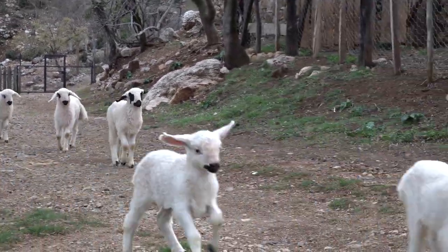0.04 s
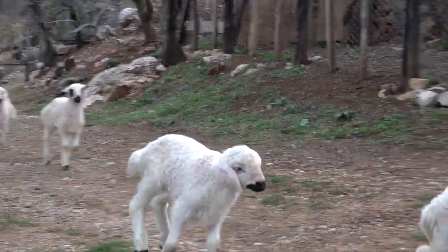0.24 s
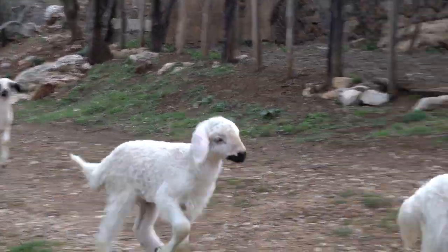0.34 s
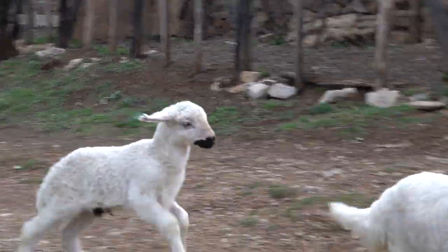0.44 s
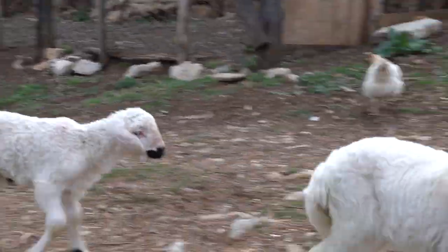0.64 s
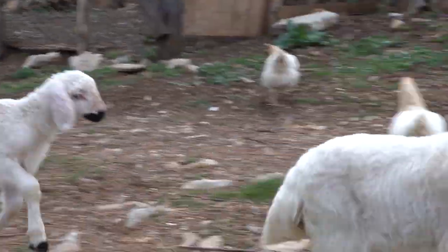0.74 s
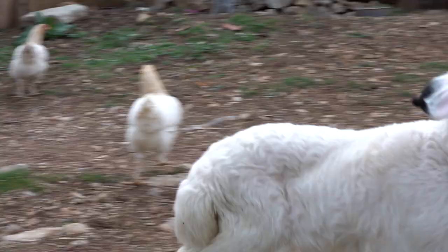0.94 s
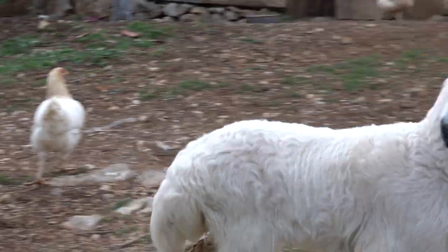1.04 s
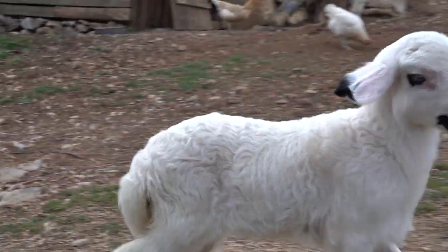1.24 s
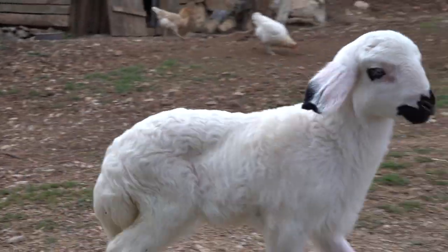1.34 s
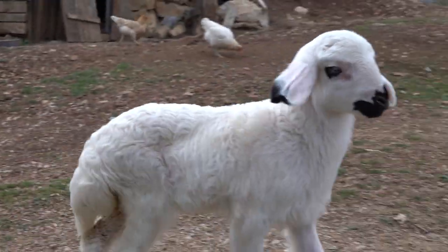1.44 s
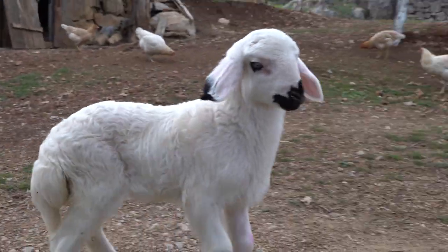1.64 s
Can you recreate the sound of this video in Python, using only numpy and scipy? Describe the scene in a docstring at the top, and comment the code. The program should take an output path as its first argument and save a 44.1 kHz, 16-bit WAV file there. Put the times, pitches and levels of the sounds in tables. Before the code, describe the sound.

A lamb close by, slightly left, gives one long quavering bleat after dull scuffs and thuds on gritty earth; three crunching steps and small stone clicks accompany it in a quiet open yard, heard in stereo.

```python
"""A lamb close by gives one long, quavering bleat, its sound leaning a little to the left: rasped pulses ring
five resonances. A walker on gritty earth gives dull scuffs (filtered grains), then three crunching steps (grain
bursts), with low thuds (decaying sines). Short ticks (damped modes and a crack) are mostly small stones. Under
it all lie a low hum (wavering sine), faint outdoor air (filtered noise) and sparse gritty clicks."""
import sys
import numpy as np
from scipy import signal
from scipy.fft import rfft, irfft
from scipy.io import wavfile
from scipy.ndimage import uniform_filter1d

SR = 44100
rng = np.random.default_rng(int(sys.argv[2]) if len(sys.argv) > 2 else 0)


def store_pcm(level_fs):
    """Save levels as 16-bit WAV."""
    pcm = np.round(np.clip(level_fs, -1, 1) * 32767).astype(np.int16)
    wavfile.write(sys.argv[1], SR, np.atleast_2d(pcm).T)


N = 74970
T = np.arange(N) / SR
HZ = np.maximum(np.fft.rfftfreq(2 * N, 1 / SR), 1)


def from_db(db):
    """Decibels to gain."""
    return 10 ** (np.asarray(db) / 20)


def rms_one(x):
    """Scale to unit power."""
    return x / np.sqrt(np.mean(x ** 2) + 1e-20)


def in_time(rows):
    """Join (t/s, value) points by straight lines."""
    return np.interp(T, *np.transpose(rows))


def at_hz(points):
    """Join (f/Hz, value) points on a log-frequency axis."""
    hz, value = np.transpose(points)
    return np.interp(np.log(HZ), np.log(hz), value)


def colour(x, gain):
    """Filter by a smooth gain per frequency."""
    return irfft(rfft(x, 2 * N) * gain)[..., :N]


def low_cut(x, hz):
    """Thin out the bass with a second-order high-pass."""
    return signal.sosfilt(signal.butter(2, hz, "high", fs=SR, output="sos"), x + 1e-18)


def pan(left_right_db):
    """Left and right gains for a level difference."""
    return from_db(np.array([[.5], [-.5]]) * left_right_db)


def drift(rate_hz):
    """Smoothed noise of spread 1, falling off above rate_hz."""
    return rms_one(colour(rng.standard_normal(N), 1 / (1 + (HZ / rate_hz) ** 2)))


def swell(start_s, attack_s, t60_s):
    """A straight rise, then an exponential fall."""
    rise = np.clip((T - start_s) / attack_s, 0, 1)
    return rise * from_db(-60 * np.maximum(T - start_s - attack_s, 0) / t60_s)


def sine(hz, t):
    """A sine at time t, starting from zero phase."""
    return np.sin(2 * np.pi * hz * t)


def grains(per_s, spread_db):
    """Two trains of random clicks of uneven size and random sign."""
    sizes = from_db(spread_db * np.minimum(rng.exponential(1, (2, N)), 4))
    signs = rng.choice([-1, 1], (2, N))
    return sizes * signs * (rng.random((2, N)) < per_s / SR)


# Stereo likeness: f/Hz, left-right likeness [0-1]
LIKENESS = [(60, 1), (300, .988), (1000, 0.72), (3000, 0.78), (5000, 0.92), (8000, 0.15), (15000, 0.68)]


def spread(pair, spectrum_db):
    """Colour two unrelated signals and mix to the left-right likeness at each frequency; rms 1."""
    alike = np.clip(at_hz(LIKENESS), 0, 1)
    mid, side = colour(pair, from_db(spectrum_db) * np.sqrt([1 + alike, 1 - alike]))
    return rms_one(np.array([mid + side, mid - side]))


# Air spectrum: f/Hz, relative level/dB per Hz
AIR = [(20, 7), (45, 4), (70, 12.5), (130, -3), (300, -2.5), (600, -5), (950, -3.5), (1500, -6),
       (3000, -10), (5000, -14.5), (7500, -17), (11000, -21), (16000, -30)]
# Air: t/s, level/dB
AIR_LEVEL = [(0, -46.5), (.13, -52.5), (.45, -43), (1.2, -49), (1.45, -51), (1.7, -52)]
# Hum: t/s, level/dB
HUM_LEVEL = [(0, -53.5), (.7, -52), (1.1, -47.5), (1.7, -48)]
# Gritty clicks and the crack of a tick: f/Hz, relative level/dB per Hz
GRIT = [(500, 4), (2000, -3.5), (5000, 4), (7500, -11), (10000, -3), (16000, -48)]
HUM_HZ, HUM_WAVER_FRACTION, HUM_WAVER_HZ = 36.3, .05, 5.2
GRIT_DB, GRIT_PER_S = -66, 69


def background():
    """Outdoor air as shaped noise, a frequency-wavering hum and sparse random clicks like loose grit."""
    air = from_db(in_time(AIR_LEVEL)) * spread(rng.standard_normal((2, N)), at_hz(AIR))
    hum_hz = HUM_HZ * (1 + HUM_WAVER_FRACTION * drift(HUM_WAVER_HZ))
    hum = np.sqrt(2) * np.sin(2 * np.pi * np.cumsum(hum_hz) / SR)
    grit = spread(grains(GRIT_PER_S, spread_db=0), at_hz(GRIT))
    return air + from_db(in_time(HUM_LEVEL)) * hum + from_db(GRIT_DB) * grit


# Dull rustles, soft low air at the start, then scuffs of a sole: t/s, level/dB, attack/s, t60/s
RUSTLES = [(0, -50, 0.0059, 1), (0.183, -40, .002, 0.31), (.2, -31, .012, 0.39), (.25, -38.5, 0.025, 0.93),
           (.385, -41, 0.0091, 0.064), (.452, -56, 0.0065, .1), (1.1, -44.5, 0.013, 0.12),
           (1.238, -47, 0.0073, 0.13)]
# Rustle spectrum: f/Hz, relative level/dB per Hz
RUSTLE = [(50, -7), (130, -8), (200, -1), (310, 3.5), (430, -8), (900, -10.5), (1300, -17.5), (2400, -18.5),
          (4200, -25.5), (5600, -22.5), (6800, -38), (15000, -47)]
GRAINS_PER_S, GRAIN_SPREAD_DB = 9000, 1.5  # also for the footfalls


def rustles():
    """Soft low air, then a sole dragging dully over packed earth: dense grains under decaying envelopes."""
    rub = spread(grains(GRAINS_PER_S, GRAIN_SPREAD_DB), at_hz(RUSTLE))
    envelope = sum(from_db(db) * swell(s, attack_s, t60_s) for s, db, attack_s, t60_s in RUSTLES)
    return pan(1.0) * rub * envelope


# Weight thuds: t/s, level/dB, t60/s
THUDS = [(.002, -49, 0.67), (.176, -29, 0.15), (0.198, -25.5, 0.15), (0.296, -30.5, 0.29),
         (0.783, -35, 0.13), (1.285, -46, 0.24)]
THUD_HZ, THUD_ATTACK_S = 62.2, 0.0056


def thuds():
    """Low, damped sine bumps of the walker's weight."""
    out = 0
    for s, db, t60_s in THUDS:
        out = out + from_db(db) * swell(s, THUD_ATTACK_S, t60_s) * sine(THUD_HZ, T - s)
    return out


# Short ticks: stones, and at 0.91 s probably a sharp pulse of the bleat
# t/s, level/dB (before the halving of each tick), main ring f/Hz, left-right/dB
TICKS = [(0.0266, -30, 5500, 0), (0.1871, -31, 2590, 4), (0.2143, -23.5, 4820, 8), (0.273, -28.5, 2380, 9),
         (.4895, -27.5, 6950, -3), (0.823, -26, 6440, -1), (0.9129, -30, 6660, 20), (1.2333, -26, 6530, 0),
         (1.2977, -23, 2680, 2), (1.433, -12, 4234, -2), (1.476, -33.5, 5470, 4), (1.5208, -31, 5330, 7.5),
         (1.5705, -30, 4300, -6.5), (1.649, -41, 4780, 12)]
# Tick modes: ratio to main ring, level/dB, t60/s
TICK_MODES = [(.47, -18, 0.023), (.58, -10, 0.015), (.78, -5, 0.0067), (1, 0, .005), (1.3, -7, 0.0079),
              (2.1, -25, 0.0069)]
CRACK_DB, CRACK_T60_S, TICK_LOW_HZ = -7.5, 0.014, 1470


def ticks():
    """Each tick is a tiny noise crack and a few short modes, as of a small stone, with the bass cut."""
    out = 0
    for s, db, hz, pan_db in TICKS:
        age_s = np.clip(T - s, 0, .2)
        modes = 0
        for k, (ratio, mode_db, t60_s) in enumerate(TICK_MODES):
            decay = from_db(mode_db - 60 * age_s / t60_s)
            modes = modes + (-1) ** k * decay * sine(hz * ratio, age_s)
        crack = spread(rng.standard_normal((2, N)), at_hz(GRIT)) * from_db(CRACK_DB - 60 * age_s / CRACK_T60_S)
        out = out + from_db(db) * pan(pan_db) * (T > s) * (modes + crack) / 2
    return low_cut(out, TICK_LOW_HZ)


# Footfalls: t/s, level/dB, t60/s, tail level/dB, treble tilt/dB per octave, left-right/dB
STEPS = [(0.339, -22, .14, -7.5, 3, 2.5), (0.781, -24.5, 0.31, -8, 2.2, 2),
         (1.234, -29.5, 0.26, -12.5, 1.6, 0.3)]
# Crunch spectrum, before tilt: f/Hz, relative level/dB per Hz
CRUNCH = [(50, 9), (130, -11), (300, 5.5), (600, -5.5), (880, 1.5), (1080, -3.5), (1330, 2), (2000, 0),
          (3000, -9), (4200, -9), (5500, -13.5), (7300, -29), (9300, -25), (12000, -42.5), (16000, -55)]
STEP_ATTACK_S, STEP_TAIL_T60_S, TILT_PIVOT_HZ = 0.0066, .42, 2000
SETTLE_PER_S, SETTLE_SPREAD_DB = 910, 3.5


def footsteps():
    """Each footfall crushes a dense burst of grit; sparser grains settle under a longer decay."""
    out = 0
    for s, db, t60_s, tail_db, tilt_db, pan_db in STEPS:
        spectrum_db = at_hz(CRUNCH) + tilt_db * np.log2(HZ / TILT_PIVOT_HZ)
        crush = spread(grains(GRAINS_PER_S, GRAIN_SPREAD_DB), spectrum_db)
        crush = crush * swell(s, STEP_ATTACK_S, t60_s)
        settle = spread(grains(SETTLE_PER_S, SETTLE_SPREAD_DB), spectrum_db)
        settle = settle * swell(s, STEP_ATTACK_S, STEP_TAIL_T60_S)
        out = out + from_db(db) * pan(pan_db) * (crush + from_db(tail_db) * settle)
    return out


def resonate(x, hz, width_hz, boost_db, size=128):
    """Lift or sink a gliding resonance, retuned once per block."""
    r, rung, state = np.exp(-np.pi * width_hz / SR), np.zeros(N), np.zeros(2)
    for i in range(0, N, size):
        poles = [1, -2 * r * np.cos(2 * np.pi * hz[i] / SR), r * r]
        rung[i:i + size], state = signal.lfilter([1, 0, -1], poles, x[i:i + size], zi=state)
    return x + (from_db(boost_db) - 1) * (1 - r * r) / 2 * rung


SMEAR_HZ, SMEAR_WIDTH_HZ = 2800, 1400


def smear(x):
    """The mouth's all-pass resonance spreads each pulse over a fraction of a millisecond."""
    r = np.exp(-np.pi * SMEAR_WIDTH_HZ / SR)
    poles = [1, -2 * r * np.cos(2 * np.pi * SMEAR_HZ / SR), r * r]
    return signal.lfilter(poles[::-1], poles, x)


# Pitch with its quaver: t/s, f/Hz
PITCH = [(.45, 227.7), (.48, 233.8), (.505, 212.1), (.539, 245.8), (.555, 205.3), (.573, 207),
         (.605, 249.4), (.633, 219.4), (.657, 227.4), (.681, 251.5), (.699, 257.7), (.733, 251.2),
         (.775, 268.5), (.799, 241.7), (.835, 269.8), (.869, 232.2), (.899, 257), (.933, 229.3),
         (.976, 256.4), (1.001, 241.2), (1.025, 251.5), (1.071, 245.9), (1.111, 191.3)]
# Rasp: t/s, amount [0-1]
RASP = [(.48, 1), (.53, 0.65), (.61, 0.54), (.7, 0.47), (.78, .22), (.87, 0.62), (.97, 0.39), (1.06, 0.37),
        (1.1, 0.75)]
JITTER_PER_RASP, JITTER_HZ = .05, 260  # pitch fraction; noise corner
UNEVEN_DB, UNEVEN_HZ, RASP_LOW_HZ = 2, 200, 890  # treble spread per unit rasp; noise corner; rasp low cut


def vocal_folds(pitch_hz):
    """Jittered harmonic pulses, uneven in the treble, and steady breathy noise that swells with each cycle."""
    rasp = np.clip(in_time(RASP), 0, 1)
    jitter = drift(JITTER_HZ)
    jitter = jitter - uniform_filter1d(jitter, size=300)
    phase = 2 * np.pi * np.cumsum(pitch_hz * (1 + JITTER_PER_RASP * rasp * jitter)) / SR
    pulses = rms_one(sum(np.cos(k * phase) for k in range(1, 56)))
    breath = rms_one(rng.standard_normal(N) * (4 + np.cos(phase)) ** 2)
    uneven = pulses * np.tanh(from_db(UNEVEN_DB * rasp * drift(UNEVEN_HZ)) - 1)
    return pulses + colour(uneven + rasp * breath, 1 / (1 + (RASP_LOW_HZ / HZ) ** 4))


# Vocal-fold spectrum: f/Hz, relative level/dB
FOLDS = [(120, -34), (250, 8), (500, 3.5), (800, 4.5), (1300, -3.5), (2000, -0.5), (3000, 5.5), (4400, 1.5),
         (5900, 2.5), (7200, -11), (10000, -18.5), (15000, -32)]
# Nasal dips: f/Hz, width/Hz, boost/dB
NASAL_DIPS = [(1148, 254, -9), (2460, 360, -5.5)]
# Throat and mouth: t/s, then f/Hz and boost/dB for each of five resonances
THROAT = [(.48, 457, 17, 840, 4.6, 1610, 28, 2320, 16, 3320, 9.4),
          (.52, 455, 10.3, 850, 26, 1930, 34, 2880, 13.5, 3300, 10.2),
          (.58, 467, 10.3, 842, 22.4, 1905, 24.2, 2930, 12.8, 3570, 15.3),
          (.64, 455, 11.5, 906, 25.3, 1933, 26, 3100, 10.4, 3560, 14),
          (.72, 470, 12.2, 854, 23, 1952, 27.8, 3060, 10.6, 3600, 15.6),
          (.83, 477, 11.2, 920, 30, 2026, 24, 3140, 14.8, 3600, 15),
          (.87, 486, 13.5, 960, 27.6, 2000, 22.5, 3090, 11.3, 3650, 17.6),
          (.935, 460, 11.7, 924, 25.4, 2003, 22.7, 3530, 11, 3690, 13),
          (.98, 480, 9.6, 935, 34.4, 1943, 22, 3350, 9.4, 3750, 17.8),
          (1.061, 470, 10.6, 941, 27.7, 1973, 17.2, 3720, 2.7, 3676, 19.8),
          (1.109, 477, 6.6, 843, 32, 1910, 19, 3800, 4.4, 4140, 19.6)]
# Width/Hz of each throat resonance
THROAT_WIDTH_HZ = [79, 102, 116, 213, 261]
# Boost per pitch rise/dB per Hz, for each throat resonance
QUAVER_DB_PER_HZ = [0.26, 0.09, 0.14, 0, 0]
# Effort: t/s, level/dB (before shimmer and pan)
EFFORT = [(.44, -71), (.465, -40.5), (.504, -40.5), (.516, -31), (.538, -25.5), (.568, -29), (.594, -25),
          (.70, -25.5), (.77, -26.5), (.84, -26), (.95, -27), (1.04, -29.5), (1.102, -30.5), (1.118, -43),
          (1.14, -55)]
# Lamb balance: f/Hz, left-right/dB
LAMB_PAN = [(200, 3), (400, 0.5), (800, 2.5), (1300, 3), (2400, 5), (4400, 4), (8000, 2.5), (15000, 13)]
VOICE_LOW_HZ, SHIMMER_DB, SHIMMER_HZ = 233, 0.3, 67


def bleat():
    """Rasped fold pulses ring the throat; the quaver in pitch flutters its resonances."""
    pitch_hz = in_time(PITCH)
    quaver_hz = pitch_hz - uniform_filter1d(pitch_hz, size=3000)
    source = colour(vocal_folds(pitch_hz), from_db(at_hz(FOLDS)))
    voice = smear(low_cut(source, VOICE_LOW_HZ))
    for hz, width_hz, dip_db in NASAL_DIPS:
        voice = resonate(voice, np.full(N, hz), width_hz, dip_db)
    s, *columns = np.transpose(THROAT)
    resonances = zip(columns[::2], columns[1::2], THROAT_WIDTH_HZ, QUAVER_DB_PER_HZ)
    for hz, boost_db, width_hz, flutter in resonances:
        fluttered_db = np.interp(T, s, boost_db) + flutter * quaver_hz
        voice = resonate(voice, np.interp(T, s, hz), width_hz, fluttered_db)
    # level the voice, then impose the effort
    power = uniform_filter1d(uniform_filter1d(voice ** 2, size=700), size=700)
    level_db = in_time(EFFORT) + SHIMMER_DB * drift(SHIMMER_HZ)
    voice = voice / np.sqrt(power + 1e-12) * from_db(level_db)
    sounding = (T > EFFORT[0][0]) * (T < EFFORT[-1][0])
    return colour(voice * sounding, pan(at_hz(LAMB_PAN)))


YARD_DB, YARD_T60_S, YARD_DELAY_S, YARD_ATTACK_S, YARD_LOW_HZ = -13, 0.25, 0.011, .004, 530


def yard(x):
    """Faint scatter from the bank, trees and sheds: convolution with delayed, decaying noise."""
    echo = rng.standard_normal((2, N)) * swell(YARD_DELAY_S, YARD_ATTACK_S, YARD_T60_S)
    echo /= np.sqrt(np.mean(np.sum(echo ** 2, axis=1)))
    return from_db(YARD_DB) * signal.fftconvolve(low_cut(x, YARD_LOW_HZ), echo, axes=1)[:, :N]


def scene():
    """The lamb and the walker in the open yard."""
    near = rustles() + footsteps() + bleat()
    return background() + thuds() + ticks() + near + yard(near)


CUTOFF_HZ = 16000


def record(dry):
    """Cut the top steeply with an elliptic low-pass."""
    return signal.sosfilt(signal.ellip(10, .1, 80, CUTOFF_HZ, fs=SR, output="sos"), dry)


dry = scene()
out = record(dry)
store_pcm(out)
```